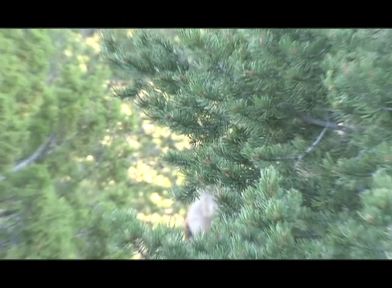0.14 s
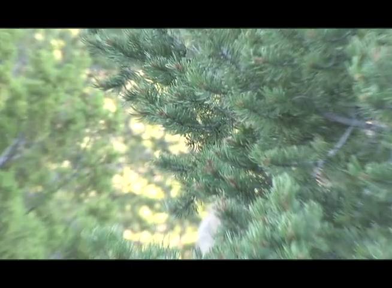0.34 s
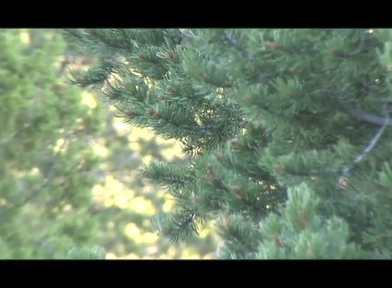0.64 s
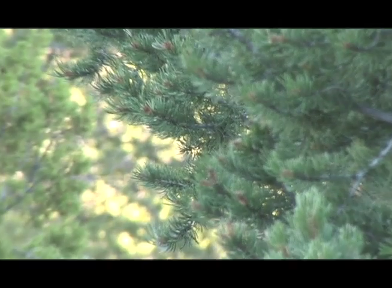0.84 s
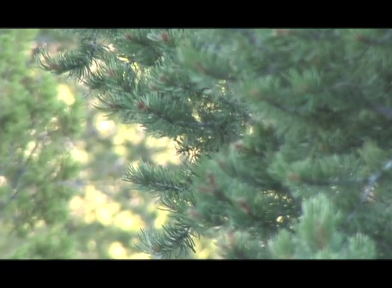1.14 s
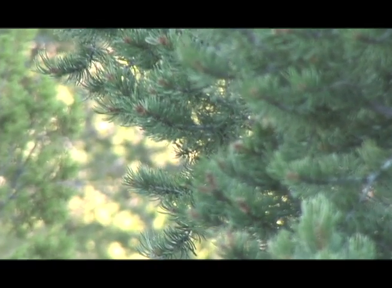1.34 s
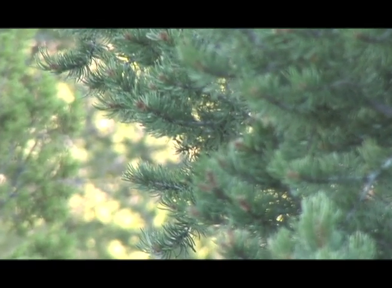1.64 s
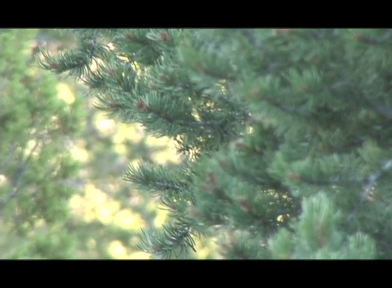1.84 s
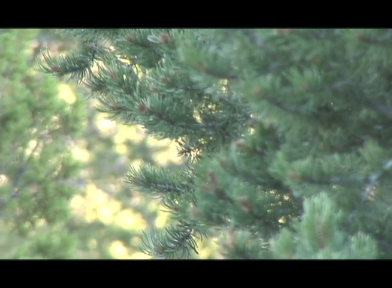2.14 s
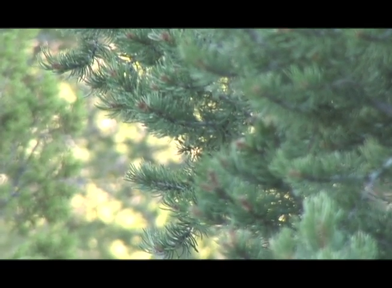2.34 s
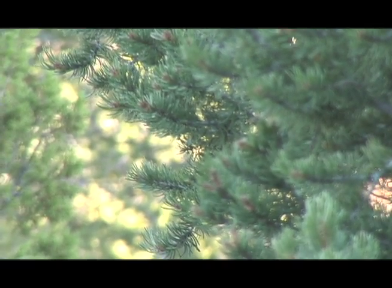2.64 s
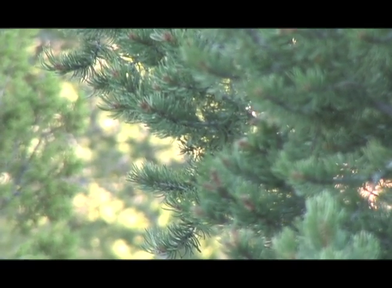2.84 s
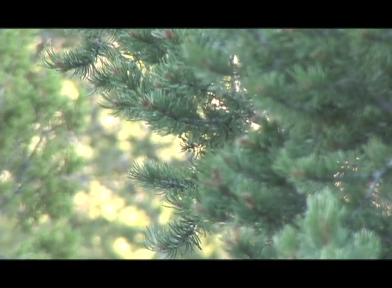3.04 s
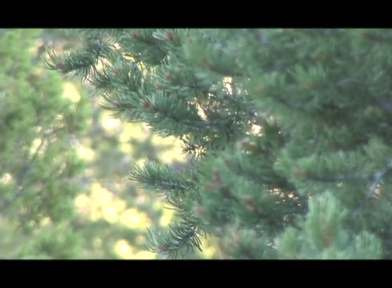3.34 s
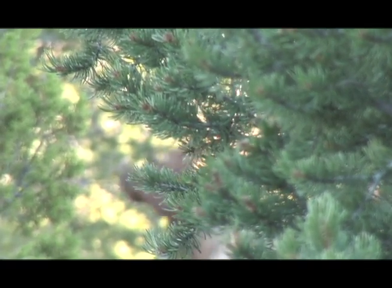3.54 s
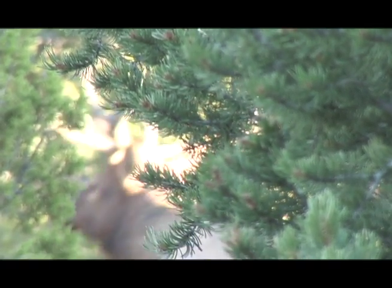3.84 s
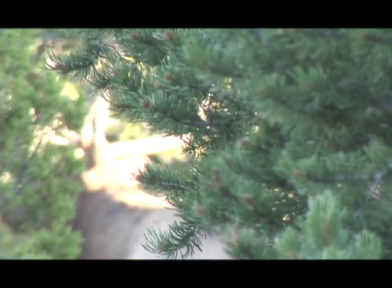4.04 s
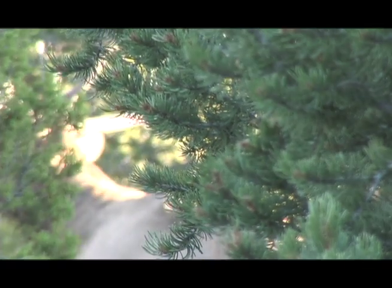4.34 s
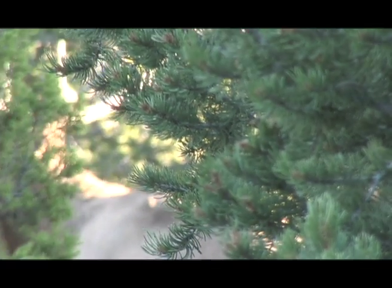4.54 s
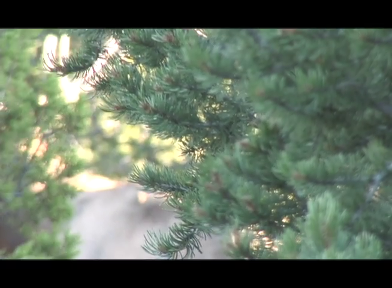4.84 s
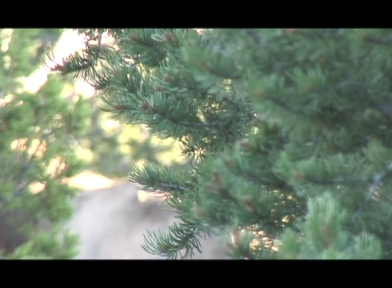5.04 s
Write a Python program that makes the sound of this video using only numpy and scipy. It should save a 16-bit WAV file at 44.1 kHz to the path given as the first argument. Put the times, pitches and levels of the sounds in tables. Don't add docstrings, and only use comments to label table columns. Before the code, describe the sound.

An elk gives four piercing squealing mews, each dropping steeply in pitch, over soft pine wind, low camera bumps and late twig ticks.

```python
import sys
import numpy as np
from scipy import signal
from scipy.fft import rfft, irfft, next_fast_len
from scipy.io import wavfile
from scipy.ndimage import uniform_filter1d

SR = 44100
rng = np.random.default_rng(int(sys.argv[2]) if len(sys.argv) > 2 else 0)


def int16_out(signal):
    q = np.round(np.clip(np.atleast_2d(signal).T, -1, 1) * 32767)
    wavfile.write(sys.argv[1], SR, q.astype(np.int16))


def gain_from_db(level_db):
    decades = np.asarray(level_db, float) / 20
    return 10 ** decades


N = 228517

# (frequency [Hz], level [dB])
THROAT_COLOUR = [(260, -18.5), (340, -22), (450, -25.5), (580, -12.5), (700, -33), (850, -10), (1250, -6.5),
                 (1900, -1), (2400, -1), (3100, 0.5), (3800, -5.5), (5300, -25.5), (6400, -23),
                 (7700, -9.5), (9000, -21), (10800, -31), (13500, -45), (15000, -62)]
SCATTER_HZ = 2120


def evened(x):
    return x / np.sqrt(np.mean(x ** 2) + 1e-20)


def read(points, hz, column=1):
    table = np.transpose(points)
    return np.interp(np.log(hz + 1), np.log(table[0] + 1), table[column])


def smooth(s, values, t):
    slope = np.gradient(values, s)
    k = np.clip(np.searchsorted(s, t) - 1, 0, len(s) - 2)
    h = s[k + 1] - s[k]
    u = (t - s[k]) / h
    ends = values[k] + (values[k + 1] - values[k]) * u * u * (3 - 2 * u)
    return ends + h * u * (1 - u) * (slope[k] * (1 - u) - slope[k + 1] * u)


def add(mix, s, sound):
    part = mix[..., round(s * SR):][..., :sound.shape[-1]]
    part += sound[..., :part.shape[-1]]


def noise(points, likeness, patchy_db):
    frames, hz = N // 256 + 5, np.fft.rfftfreq(1024, 1 / SR)
    a, b, c, d, patches = rng.standard_normal((frames, 513, 5)).T
    patches = uniform_filter1d(patches, size=10, axis=0)
    patches = evened(uniform_filter1d(patches, size=14, axis=1))
    same = np.clip(likeness(hz), -1, 1)[:, None]
    left = a + 1j * b
    right = same * left + np.sqrt(1 - same ** 2) * (c + 1j * d)
    z = np.array([left, right]) * gain_from_db(read(points, hz)[:, None] + patchy_db * patches)
    return evened(signal.istft(z, nperseg=1024, noverlap=768)[1][:, :N])


def needles():
    # (frequency [Hz], level [dB per Hz])
    wash = [(88, -17.5), (150, -6), (290, -10.5), (631, -4.5), (695, -8), (828, -7.5), (1010, -11),
            (1270, -12.5), (3040, -25.5), (5040, -27.5), (15500, -31.5)]
    # (frequency [Hz], likeness [0-1])
    alike = [(60, 0.79), (150, 0.14), (380, 0.86), (950, 0.806), (2380, 0.45), (5980, 0.1), (15000, 0.089)]
    return gain_from_db(-57.5) * noise(wash, lambda hz: read(alike, hz), patchy_db=0.68)


def wind_rumble():
    # (time [s], level [dB])
    gusts = [(0.0, -58), (0.26, -58.5), (1.36, -55), (2.75, -60), (2.87, -67), (3.01, -51.5), (3.26, -56)]
    # (frequency [Hz], level [dB per Hz])
    rumble = [(20, -34), (40, -15), (62, -5.5), (85, -6.5), (110, -13.5), (150, -16), (200, -36.5),
              (300, -49.5)]
    breeze_db, rise_s, fade_db_per_s = -64, 0.013, 74.5
    t = np.arange(N) / SR
    wind = gain_from_db(breeze_db)
    for s, db in gusts:
        rise = np.clip(1 + (t - s) / rise_s, 0, 1)
        wind = wind + rise * gain_from_db(db - fade_db_per_s * np.maximum(t - s, 0))
    rough = noise(rumble, lambda hz: np.interp(hz, [50, 130], [.88, .4]), patchy_db=2.0)
    return gain_from_db(2.0) * rough * wind


def body_knocks():
    # (time [s], peak level [dB], frequency [Hz])
    knocks = [(0.0, -44, 58), (0.514, -51, 75), (0.739, -50.5, 65.4), (1.338, -35, 68), (1.592, -50, 64.6),
              (2.675, -40.5, 84.03), (2.841, -53, 53.8), (2.987, -39, 86.7), (4.67, -52, 46),
              (4.811, -56, 92)]
    out, u = np.zeros(N), np.arange(8000) / SR
    for s, db, hz in knocks:
        decay = gain_from_db(db - 60 * u / 0.29)
        add(out, s, decay * np.sin(2 * np.pi * hz * u) * np.minimum(u / .012, 1))
    return out


def zoom_motor():
    start_s, end_s, rest_hz, rise_hz = 0.155, 0.42, 103.41, 13.44
    t = np.arange(N) / SR
    run = np.sin(np.pi * np.clip((t - start_s) / (end_s - start_s), 0, 1))
    turns = 2 * np.pi * np.cumsum(rest_hz + rise_hz * run) / SR
    return gain_from_db(-46) * run * np.array([0.32 * np.sin(turns + 2.14), 0.95 * np.sin(turns)])


def twigs():
    # (time [s], peak level [dB], frequency [Hz], left minus right [dB])
    ticks = [(0.2317, -55.5, 6150, 0.0), (0.62, -46, 7570, 9), (0.8964, -53.5, 4430, 15),
             (1.6094, -64.5, 7640, 7.5), (2.0068, -50.5, 5370, 7.5), (3.0193, -55, 4780, 6),
             (4.2592, -48, 8300, 30), (4.37, -48.5, 5860, 20), (4.4753, -36, 6500, 10.5),
             (4.5, -57, 7700, -1), (4.5593, -48, 7000, 9), (4.6569, -53.5, 5664, 4),
             (4.6815, -46, 4360, 8.5), (4.7724, -66, 5070, 9), (4.791, -54.5, 8490, 6),
             (4.806, -51.5, 8180, 21), (4.8472, -44.5, 5900, 10), (4.8844, -57.5, 4000, 2.0),
             (4.986, -50, 8200, 11), (5.0194, -51, 6410, -1.5), (5.065, -58, 6800, -4)]
    out, t = np.zeros((2, N)), np.arange(500) / SR
    band = signal.butter(2, [3000, 9500], "band", fs=SR)
    grit = signal.lfilter(*band, rng.standard_normal((len(ticks), 500)))
    peak_s = .0003
    for (s, db, hz, pan_db), g in zip(ticks, grit):
        ping = np.sin(2 * np.pi * hz * t) * np.exp(-((t - peak_s) / 0.000149) ** 2)
        snap = ping + 0.27 * g * gain_from_db(-60 * t / 0.037)
        add(out, s - peak_s, gain_from_db(db + np.array([[pan_db / 2], [-pan_db / 2]])) * snap)
    return out


def throat():
    hz = np.fft.rfftfreq(2048, 1 / SR)
    log_gain = uniform_filter1d(read(THROAT_COLOUR, hz), size=3) * np.log(10) / 20
    phase = -signal.hilbert(np.r_[log_gain, log_gain[-2:0:-1]]).imag[:len(hz)]
    return hz, log_gain, phase


def throat_air(count):
    colour = gain_from_db(read(THROAT_COLOUR, np.fft.rfftfreq(count, 1 / SR)))
    return evened(irfft(rfft(rng.standard_normal(count)) * colour, count))


def mew(rows, manner, tract):
    level_db, attack, release, tight_db, low_db = manner
    t = np.arange(rows[0][0], rows[-1][0], 1 / SR)
    since = t - t[0]
    edge = np.maximum(1 - np.minimum(since / attack, (t[-1] - t) / release), 0)
    onset_lift_db = 2.5 * np.exp(-((since - attack) / 0.0051) ** 2)

    waver = np.exp(-((t - 3.272) / .058) ** 2)
    scoop = np.exp(-abs(t - 3.034) / .03)
    times, pitches = np.transpose(rows)
    hz = np.exp(smooth(times, np.log(pitches), t)) * (1 - 0.18 * waver - .07 * scoop)

    slack_hz, tight_hz = 1395, 1537
    tight = np.clip((hz - slack_hz) / (tight_hz - slack_hz), 0, 1)
    sag_db = 5.0 * np.minimum(np.log2(hz / 1270), 0)
    effort_db = level_db - 38 * edge + onset_lift_db + 5 * waver + sag_db + 2 * tight
    effort = gain_from_db(uniform_filter1d(effort_db, size=120, mode="nearest") + 11.5)

    slack_share, brighten_db_per_s, warmup_db = 0.44, 12, 17
    soft_db = -0.2 + tight_db * (slack_share + (1 - slack_share) * tight)
    soft_db = soft_db - brighten_db_per_s * since + warmup_db * np.exp(-since / attack)
    muffle_db = 15 * edge

    wobble = evened(uniform_filter1d(rng.standard_normal(len(t)), size=120))
    hz = hz + 7 * np.clip(1 - hz / 1700, .1, 1) * wobble
    turns, voice, power = np.cumsum(hz) / SR, np.zeros(len(t)), np.zeros(len(t))
    for k in range(1, 61):
        on = k * hz < 16000
        if k == 1:
            source_db = low_db + onset_lift_db[on]
        else:
            source_db = -soft_db[on] * min(np.log2(k / 2), 0.87) - muffle_db[on] * min(np.log2(k), 2)
        gain = np.exp(np.interp(k * hz[on], tract[0], tract[1])) * gain_from_db(source_db)
        phase = np.interp(k * hz[on], tract[0], tract[2])
        voice[on] += gain * np.cos(2 * np.pi * k * turns[on] + phase)
        power[on] += gain ** 2 / 2
    sound = voice / np.sqrt(power) + gain_from_db(-44) * throat_air(len(t))
    return effort * sound * signal.windows.tukey(len(t), .02)


def elk():
    # (time [s], pitch [Hz])
    mews = [
        [(0.985, 1670), (1.03, 1645), (1.08, 1652), (1.11, 1640), (1.145, 1480), (1.2, 1113), (1.27, 683.3),
         (1.34, 403), (1.422, 234)],
        [(2.139, 1450), (2.165, 1509), (2.23, 1592), (2.27, 1502), (2.31, 1190), (2.37, 739), (2.43, 409),
         (2.475, 263.4)],
        [(3.034, 1740), (3.14, 1756), (3.41, 1769), (3.5, 1742), (3.56, 1511), (3.62, 1001), (3.68, 552),
         (3.73, 475.7), (3.785, 715)],
        [(3.774, 700), (3.805, 1175), (3.835, 1639), (3.87, 1761), (3.925, 1496), (3.96, 1305), (4.0, 875),
         (4.045, 385.5), (4.08, 257)],
    ]
    # (effort [dB], attack [s], release [s],
    # softness at full pitch [dB per doubling], lift of the lowest tone [dB])
    manners = [(-17, 0.014, 0.0297, 13, 2), (-18.5, .012, 0.0308, 9.5, 3.5), (-14.5, .013, 0.073, 9.5, 2.5),
               (-14.5, 0.044, 0.038, 2, 2.5)]
    # (start [s], end [s], level [dB])
    onset_air = [
        (0.894, 1.029, -47.5),
        (2.091, 2.193, -47),
        (2.99, 3.081, -46.5),
    ]
    tract, out = throat(), np.zeros(N)
    for rows, manner in zip(mews, manners):
        add(out, rows[0][0], mew(rows, manner, tract))
    for start, end, db in onset_air:
        count = round((end - start) * SR)
        swell = np.linspace(0, 1, count) * signal.windows.tukey(count, .1)
        add(out, start, gain_from_db(db) * throat_air(count) * swell)
    return out


def nearby(x):
    # (frequency [Hz], level [dB], phase ahead [rad])
    right_port = [(350, -0.5, -0.5), (648, -8.5, -2), (740, 1, -1.3), (856, -10, 1.8), (1134, -11, 0.95),
                  (1640, -6, 3.5), (2440, 1, 3.5), (3346, -5, 3.5), (4120, 0.5, 3.5), (5310, -3, 6.0),
                  (6660, -2.5, 4), (7334, -4, 6), (8550, -4.5, 6), (9600, -8.5, 7.5), (13000, 0.5, 7)]
    # (delay [s], signed gain [ratio])
    echoes = [
        [(.0018, 0.26), (.0029, 0.094), (.0061, 0.079), (.0074, 0.15), (.0091, 0.03), (.0133, 0.062)],
        [(.0012, 0.23), (.0017, 0.074), (.0028, .3), (.0054, 0.42), (.0083, 0.11), (.014, 0.023)],
    ]
    size = next_fast_len(N + SR)
    hz = np.fft.rfftfreq(size, 1 / SR)
    ports = [1, gain_from_db(read(right_port, hz)) * np.exp(1j * read(right_port, hz, column=2))]
    rough = hz ** 2 / (hz ** 2 + SCATTER_HZ ** 2)
    heard = []
    for port, taps in zip(ports, echoes):
        path = 1 + rough * sum(g * np.exp(-2j * np.pi * hz * s) for s, g in taps)
        heard.append(irfft(rfft(x, size) * port * path, size)[:N])
    return np.array(heard)


def branches(x):
    t = np.arange(3000) / SR
    taps = rng.standard_normal((3000, 2)).T * gain_from_db(-60 * t / 0.068) * (t > .003)
    taps = taps / np.linalg.norm(taps[0])
    taps = signal.lfilter(*signal.butter(2, SCATTER_HZ, "high", fs=SR), taps)
    return gain_from_db(-8.5) * signal.oaconvolve(x, taps, axes=1)[:, :N]


def woods(x):
    # (frequency [Hz], t60 [s])
    decay = [(500, 0.6), (1800, 0.953), (3500, 0.78), (6000, 0.73), (10000, 0.01)]
    # (frequency [Hz], level [dB])
    tone = [(400, -17.5), (1500, -7.5), (2800, -4), (3800, 1), (5000, -2), (8000, 0), (12000, -23)]
    hz, t, z = signal.stft(rng.standard_normal((SR, 2)).T, SR, nperseg=256)
    shape_db = read(tone, hz)[:, None] - 60 * t / read(decay, hz)[:, None]
    tail = signal.istft(z * gain_from_db(shape_db), SR, nperseg=256)[1][:, :SR]
    tail = tail * np.clip(np.arange(SR) / SR / 0.049 - .4, 0, 1)
    return gain_from_db(-39.5) * signal.fftconvolve(x[None], tail / np.linalg.norm(tail[0]), axes=1)[:, :N]


def rustle():
    # (time [s], level [dB])
    strokes = [
        (4.27, -70.5),
        (4.37, -65.5),
        (4.8, -70.5),
    ]
    stroke_s, bed_from_s, bed_db = 0.042, 4.2, -72.5
    leaf_tone = [(1500, -41), (3500, -17.5), (7000, -14.5), (10000, -17.0), (15000, -37.0)]  # (Hz, dB)
    brush = noise(leaf_tone, lambda hz: 0.48 + 0 * hz, patchy_db=0.687)
    crackle = gain_from_db(3 * evened(uniform_filter1d(rng.standard_normal(N), size=60)))
    t = np.arange(N) / SR
    swell = sum(gain_from_db(db) * np.exp(-((t - s) / stroke_s) ** 2) for s, db in strokes)
    bed = gain_from_db(bed_db) * np.clip((t - bed_from_s) / stroke_s, 0, 1)
    return brush * crackle * (swell + bed)


def scene():
    ambience = needles() + wind_rumble() + body_knocks() + zoom_motor() + twigs()
    voice = elk()
    near = nearby(voice)
    return ambience + near + branches(near) + woods(voice) + rustle()


def top_cut(x):
    return signal.sosfilt(signal.butter(12, 15690, fs=SR, output="sos"), x)


def record(dry):
    power = uniform_filter1d((dry ** 2).mean(0), size=300)
    over_db = np.maximum(10 * np.log10(abs(power) + 1e-12) + 23.0, 0)
    duck_db = 0
    for share, time_s in [(0.67, 0.0033), (0.15, .6)]:
        pole = np.exp(-1 / (time_s * SR))
        duck_db = duck_db + share * signal.lfilter([1 - pole], [1, -pole], over_db)
    release = np.arange(N) * 17.7 / SR
    duck_db = np.maximum.accumulate(duck_db + release) - release
    return top_cut(dry / gain_from_db(duck_db))


dry = scene()
out = record(dry)
int16_out(out)
```